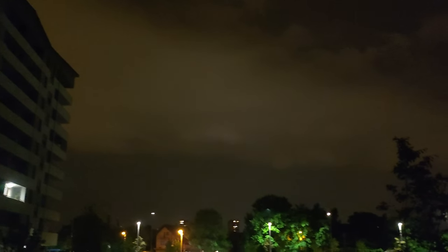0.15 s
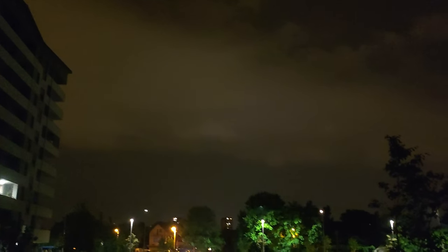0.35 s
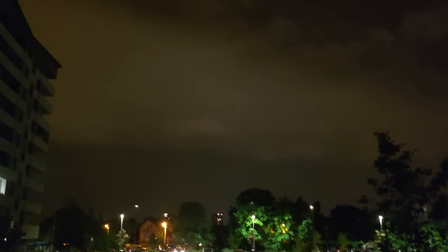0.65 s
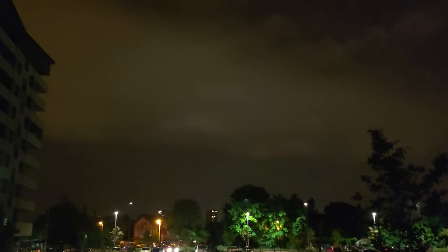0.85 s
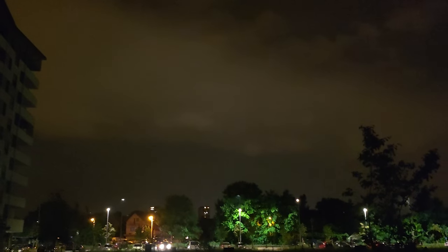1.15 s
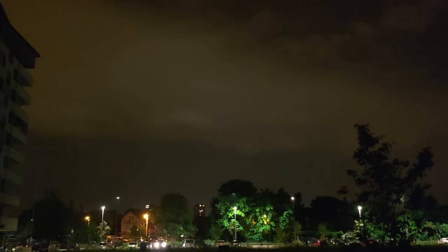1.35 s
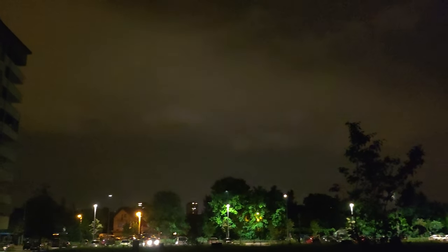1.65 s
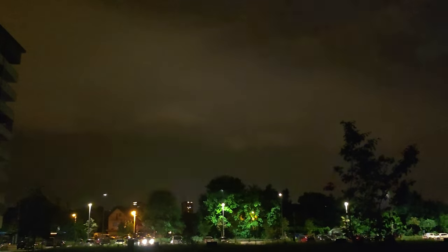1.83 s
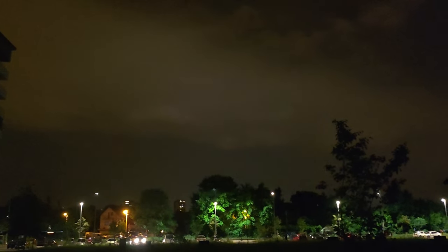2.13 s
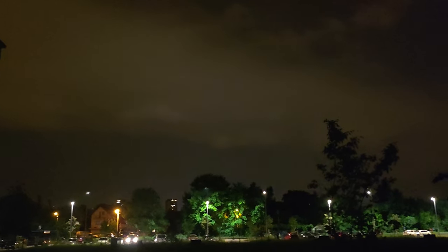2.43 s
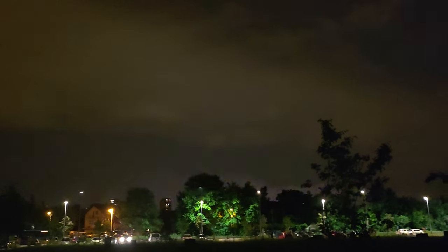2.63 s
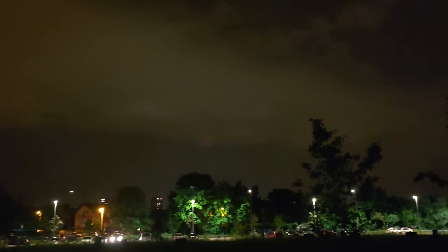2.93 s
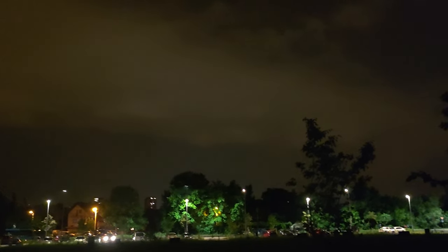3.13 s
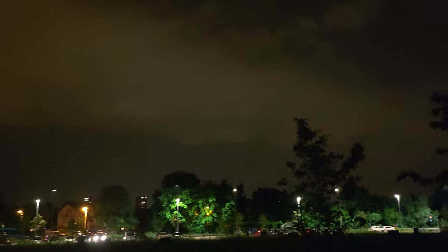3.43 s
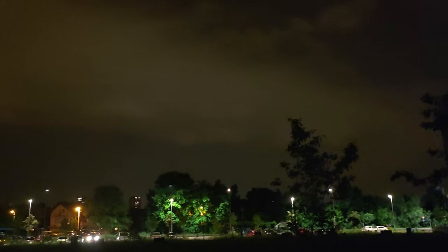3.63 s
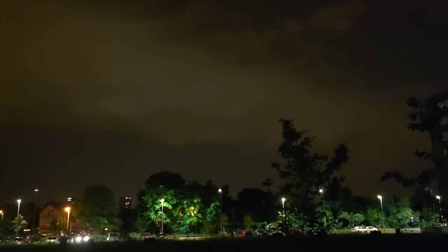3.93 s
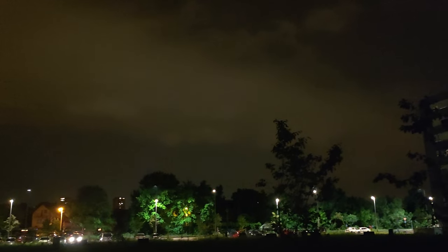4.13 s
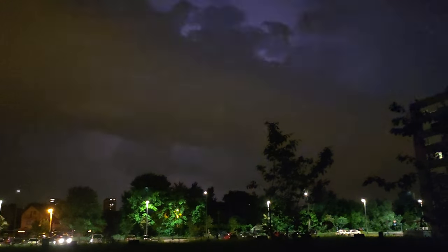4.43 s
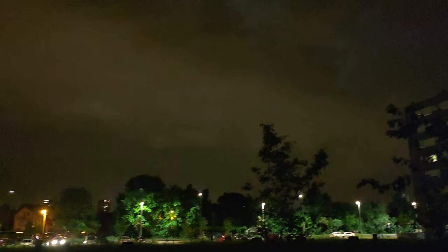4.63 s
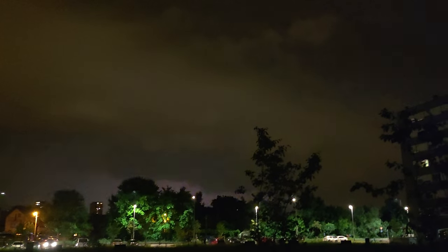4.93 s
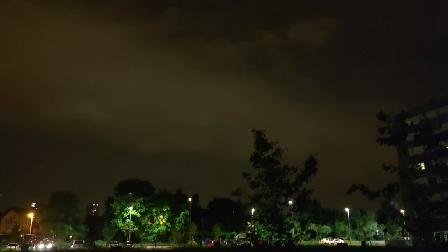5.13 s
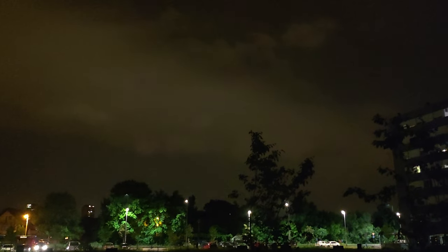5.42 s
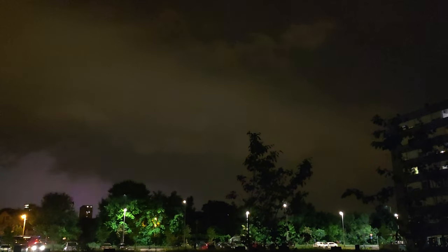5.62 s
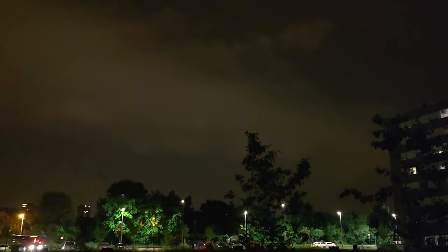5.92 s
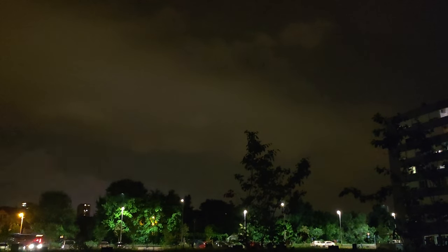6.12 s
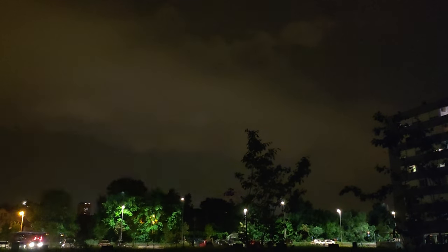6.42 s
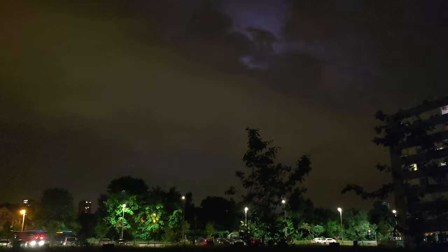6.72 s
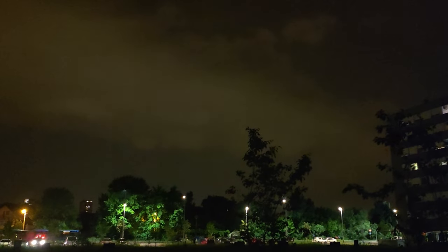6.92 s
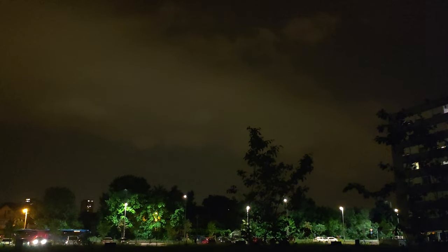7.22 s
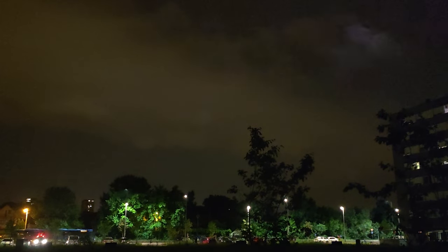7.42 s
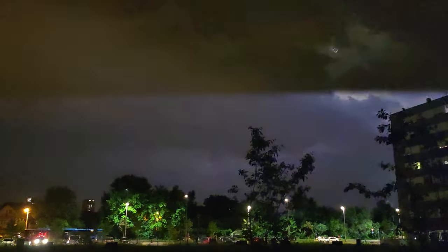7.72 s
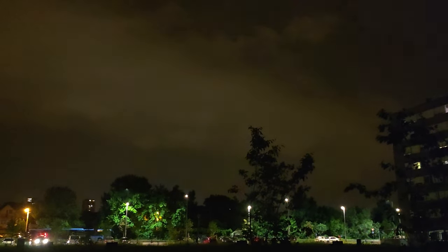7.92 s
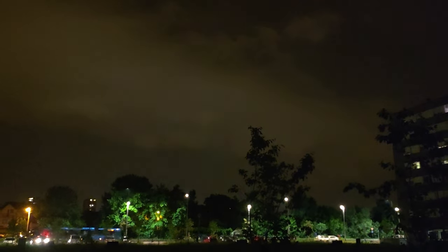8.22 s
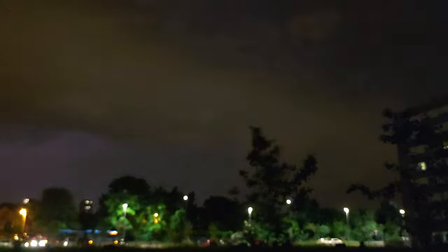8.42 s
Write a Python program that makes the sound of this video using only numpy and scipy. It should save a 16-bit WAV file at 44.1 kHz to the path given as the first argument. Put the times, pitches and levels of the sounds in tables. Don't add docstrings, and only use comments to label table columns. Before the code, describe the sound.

Outdoor city night heard through a hand-held camera's two microphones: distant traffic rumble and a heavy engine climbing in pitch, shifting gear midway and pulling again, louder towards the end. High, dry cricket rasps pulse continuously, the closest leaning left, with others blurred behind. One close, crisp cluster of plastic snaps sounds near the start. No thunder is heard.

```python
import sys
import numpy as np
from scipy import signal
from scipy.fft import rfft, irfft, next_fast_len
from scipy.io import wavfile
from scipy.ndimage import uniform_filter1d

SR = 44100
rng = np.random.default_rng(int(sys.argv[2]) if len(sys.argv) > 2 else 0)


def persist_wave(psi):
    counts = np.round(np.clip(psi, -1, 1) * 32767).astype(np.int16)
    wavfile.write(sys.argv[1], SR, np.atleast_2d(counts).T)


def boost(x):
    u = np.asarray(x, float) / 20
    return 10 ** u


N = 377496
T = np.arange(N) / SR

# (t/s, body level/dB, shrill top level/dB)
SONG = [(0, -54, -58.5), (.55, -57, -59.5), (.9, -58.5, -67.5), (2.0, -59, -65), (2.76, -54.5, -62),
        (3.1, -60, -72), (3.4, -58, -62.5), (4.24, -58, -68.5), (4.67, -54.5, -62), (4.95, -58, -58),
        (5.4, -58, -61.5), (5.8, -54.5, -57), (6.77, -58, -60), (7.29, -51.5, -56), (7.7, -53.5, -57.5),
        (8.18, -53.5, -58.5), (8.56, -61.5, -67.5)]
# (f/Hz, level/dB)
WING = [(6000, -40), (7500, -20), (8100, -1.5), (8600, 1.5), (9200, -2), (10100, -10.5), (11400, -16),
        (12300, -30), (14800, -26), (16000, -41.5)]
# (delay/s, half length/s, level/dB)
STROKES = [
    (0, .0043, 0),
    (.024, .006, -1.5),
]


def evened(x):
    return x / np.sqrt(np.mean(x ** 2) + 1e-20)


def read(points, hz):
    f, value = np.transpose(points)
    return np.interp(np.log(hz + 1), np.log(f + 1), value)


def columns(rows):
    s, *rest = np.transpose(rows)
    return [np.interp(T, s, c) for c in rest]


def coloured(x, spectrum):
    size = next_fast_len(N)
    gain = boost(read(spectrum, np.fft.rfftfreq(size, 1 / SR)))
    return irfft(rfft(x, size) * gain, size)[..., :N]


def drift(per_s):
    rates = np.geomspace(per_s / 8, per_s, num=12)
    coarse = sum(np.sin(2 * np.pi * (f * T[::64] + rng.random())) for f in rates)
    return np.interp(T, T[::64], evened(coarse))


def hump(s, span):
    return np.exp(-((T - s) / span) ** 2)


def tilt(lean_db):
    return boost(np.array([[.5], [-.5]]) * lean_db)


def pair(x, lean_db, lead):
    return np.array([x, np.interp(T - lead / SR, T, x)]) * tilt(lean_db)


def air(spectrum, lead, alike, patchy_db):
    # (f/Hz, likeness/1)
    likeness = [(20, 0.533), (60, 0.484), (130, 0.95), (300, 0.948), (700, 1), (1500, 0.346), (4000, 0.115),
                (8000, 0.076)]
    # (f/Hz, left minus right/dB)
    balance = [(100, 0.5), (1500, -2), (3500, 1.5), (5500, 8.5), (7200, 17), (8700, 3), (11000, 7),
               (13500, 2)]
    frames, hz = N // 512 + 6, np.fft.rfftfreq(2048, 1 / SR)
    a, b, c, d, patches = rng.standard_normal((frames, 1025, 5)).T
    patches = uniform_filter1d(patches, size=16, axis=0)
    patches = evened(uniform_filter1d(patches, size=8, axis=1))
    same = np.clip(alike * read(likeness, hz), -1, 1)[:, None]
    late = np.exp(-2j * np.pi * hz * lead / SR)[:, None]
    left = a + 1j * b
    right = same * late * left + np.sqrt(1 - same ** 2) * (c + 1j * d)
    z = np.array([left, right])
    z *= boost(read(spectrum, hz)[:, None] + patchy_db * patches)
    z *= tilt(read(balance, hz))[..., None]
    return evened(signal.istft(z, nperseg=2048, noverlap=1536)[1][:, :N])


def engine():
    # (t/s, firing rate f/Hz, firing tone level/dB, half tone level/dB, upper tone level/dB)
    pull = [(0, 106.2, -47.5, -51.5, -51.5), (.45, 107.2, -51.5, -49.5, -57.5),
            (1.0, 112.1, -39.5, -50, -56.5), (1.6, 117.3, -49, -41, -50.5), (2.0, 123, -39.5, -48.5, -53),
            (2.4, 129.9, -45, -52, -49.5), (2.7, 132.9, -35.5, -41.5, -46.5), (3.0, 134.6, -43, -58, -55),
            (3.2, 136.8, -34, -48, -53.5), (3.55, 138.8, -40.5, -41, -50),
            (3.8, 128.7, -34.5, -49.5, -47.5), (4.35, 93.87, -40.5, -48, -45),
            (4.75, 97.13, -34.5, -48, -39.5), (5.8, 104.8, -39.5, -41.5, -49),
            (7.0, 114.8, -31.5, -42.5, -50.5), (7.5, 119.1, -35.5, -49.5, -53),
            (7.9, 122.1, -27, -39.5, -58.5), (8.3, 126.1, -36, -40, -49)]
    # (twelfths of the firing rate/1, level under the firing tone/dB)
    uneven = [(8, -21), (9, -17.5), (11, -21), (13, -23.5), (15, -18.5), (16, -27), (17, -47), (19, -30.5),
              (20, -25.5), (21, -22), (23, -23.5), (24, -28), (27, -29.5), (30, -29), (33, -35),
              (36, -35.5)]
    lift_hz_per_s = 51.7

    hz, firing_db, half_db, upper_db = columns(pull)
    hz = hz - lift_hz_per_s * np.maximum(T - pull[-1][0], 0)
    turns = np.cumsum(hz * (1 + 0.003 * drift(9))) / SR
    load_db = uniform_filter1d(firing_db, size=SR)
    # (multiple of the firing rate, level, depth of fading in dB)
    tones = [(1, firing_db, 1.6), (1 / 2, half_db, 2.5), (3 / 2, upper_db, 2.5)]
    tones += [(k / 12, load_db + db, 4.0) for k, db in uneven]
    sound = 0
    for k, db, fade_db in tones:
        level = boost(db + fade_db * drift(6))
        sound = sound + level * np.sin(2 * np.pi * (k * turns + rng.random()))
    return pair(np.sqrt(2) * sound, lean_db=0.8, lead=9.3)


def road():
    # (t/s, effort level/dB)
    effort = [(0, -18.5), (1.4, -9.5), (1.9, -4), (3.5, 2), (4.3, -3), (5.5, -0.5), (7.1, -1.5), (8.2, 3)]
    # (f/Hz, density/dB)
    rumble_colour = [(15, -1.5), (25, 0), (50, -2.5), (90, -5), (150, -11), (250, -19.5), (400, -35.5),
                     (600, -52.5)]
    # (f/Hz, level/dB)
    wash_colour = [(150, -7.5), (300, -1.5), (470, -1.5), (950, -0.5), (1300, -6), (2400, -12.5),
                   (5000, -17), (7000, -18.5), (12500, -52.5), (16000, -49.5)]
    # (f/Hz, level/dB)
    hiss_colour = [(1000, -34.5), (1400, 2), (2200, -1), (2700, -12), (3100, 0), (3600, 1.5), (4150, -2.5),
                   (4550, -6.5), (6500, -9), (9000, -21.5)]

    effort_db, = columns(effort)
    rumble_db = -40 + 3.5 * hump(4.89, 1.66) + 1.05 * drift(2.5)
    wash_db = -52.5 + 0.0783 * effort_db
    hiss_db = -56 + effort_db
    rumble = boost(rumble_db) * air(rumble_colour, lead=11.0, alike=1.0, patchy_db=0.71)
    wash = boost(wash_db) * air(wash_colour, lead=11.75, alike=0.663, patchy_db=1.03)
    hiss = boost(hiss_db) * air(hiss_colour, lead=13.06, alike=1.81, patchy_db=1.49)
    return rumble + wash + hiss


def rasp(pairs, level_db, wing, strokes):
    per_s = np.gradient(pairs) * SR
    strength_db = 2.6 * rng.standard_normal((400, 2))
    push = 0
    for k, (delay, half, db) in enumerate(strokes):
        place = pairs - delay * per_s + .5
        since = (place % 1 - .5) / per_s
        stroke_db = db + strength_db[place.astype(int) % 400, k]
        push = push + boost(stroke_db) * np.exp(-(since / half) ** 2)
    teeth = rng.standard_normal(N) * (rng.random(N) < 16000 / SR)
    return boost(level_db) * evened(coloured(push * teeth, wing))


def near_cricket():
    # (t/s, pairs of strokes sung so far/1)
    beats = [(-.383, 0), (1.643, 30), (3.278, 54), (6.5, 102), (7.308, 114), (8.937, 138)]
    # (f/Hz, level/dB)
    shrill_wing = [(6500, -29.5), (7600, -5), (9700, -3), (10900, 1), (11700, -3.5), (12600, -22),
                   (14500, -20), (15700, -27)]
    # (delay/s, half length/s, level/dB)
    shrill_strokes = [
        (0, .006, -1.5),
        (.023, .009, 0),
    ]

    body_db, shrill_db = columns(SONG)
    pairs, = columns(beats)
    body = rasp(pairs, body_db, WING, STROKES)
    shrill = rasp(pairs, shrill_db + 0.6, shrill_wing, shrill_strokes)
    return pair(body, lean_db=10.5, lead=14) + pair(shrill, lean_db=12.0, lead=14)


def far_cricket():
    # (t/s, pairs of strokes sung so far/1)
    beats = [(-.028, 0), (1.517, 24), (3.465, 54), (4.648, 72), (6.991, 108), (8.931, 138)]
    pairs, = columns(beats)
    level_db = -59 + 3.5 * hump(3.53, 0.74)
    return pair(rasp(pairs, level_db, WING, STROKES), lean_db=-1.5, lead=-6.5)


def chorus():
    others = 0
    # (pairs a second, left minus right dB, lead in samples)
    for per_s, lean_db, lead in [(9.5, 5.5, 8.5), (13.0, -6.0, 18.0), (15.9, 13.0, -12.5), (8.3, 6.5, -1.5)]:
        pairs = rng.random() + per_s * T + 0.305 * drift(0.37)
        level_db = -7.5 + 0.67 * drift(0.87)
        others = others + pair(rasp(pairs, level_db, WING, STROKES), lean_db, lead)
    blur = boost(2.0) * air(WING, lead=16.0, alike=0.68, patchy_db=4.0)
    near_db = columns(SONG)[0]
    return boost(-55.5 + 0.365 * (near_db - near_db.mean())) * (others + blur)


def click():
    # (t/s, peak level/dB, left minus right/dB, ring f/Hz)
    snaps = [
        (1.5796, -18, -12.5, 7207),
        (1.5808, -21, -4, 1700),
        (1.5847, -24.5, 12.5, 2668),
        (1.587, -16.5, 11.5, 8146),
        (1.5946, -25, 2, 6200),
        (1.5992, -26, 7, 8840),
        (1.6938, -31, 9.5, 8700),
    ]
    # (f/Hz, level/dB, t60/s)
    case_modes = [(213.1, -29, 0.197), (264.5, -29, 0.088), (314.7, -25, 0.055), (380.5, -32.5, 0.141),
                  (590, -35, 0.092), (702.3, -36.5, 0.088), (993.5, -36, 0.073), (1241, -40, .06),
                  (1430, -42.5, 0.071), (1793, -48.5, 0.052), (2800, -44.5, 0.065)]

    out, t = np.zeros((2, N)), T[:SR // 4]
    band = signal.butter(2, [1100, 9000], "band", fs=SR)
    for s, db, lean_db, hz in snaps:
        decay = boost(-60 * t / 0.0107) + boost(-8 - 60 * t / 0.087)
        crack = signal.lfilter(*band, rng.standard_normal((2, len(t))) * decay)
        ring = np.sin(2 * np.pi * hz * t) * boost(-60 * t / 0.0089)
        at = round(s * SR)
        out[:, at:at + len(t)] += boost(db - 5.0) * (0.587 * crack + 0.702 * ring) * tilt(lean_db)
    hollow = sum(boost(db - 60 * t / t60) * np.sin(2 * np.pi * hz * t) for hz, db, t60 in case_modes)
    at = round(1.5843 * SR)
    out[:, at:at + len(t)] += np.minimum(t / 0.00072, 1) * hollow
    return out


def passers():
    # (t/s, half length/s, f/Hz, level/dB)
    glimpses = [
        (4.15, .17, 131, -41),
        (1.77, .12, 680, -62),
    ]
    sound = sum(boost(db) * hump(s, span) * np.sin(2 * np.pi * hz * T) for s, span, hz, db in glimpses)
    return pair(np.sqrt(2) * sound, lean_db=0.14, lead=9.2)


def bump():
    # (t/s, level/dB, f/Hz, t60/s)
    thud = (6.5, -25, 53, 0.01)
    s, db, hz, t60 = thud
    t = np.maximum(T - s, 0)
    return boost(db - 60 * t / t60) * np.minimum(t / 0.00983, 1) * np.sin(-2 * np.pi * hz * t)


def scene():
    crickets = near_cricket() + far_cricket() + chorus()
    return engine() + road() + crickets + click() + passers() + bump()


def top_cut(x):
    return signal.sosfilt(signal.butter(12, 15780, fs=SR, output="sos"), x)


def record(dry):
    return top_cut(dry)


dry = scene()
out = record(dry)
persist_wave(out)
```